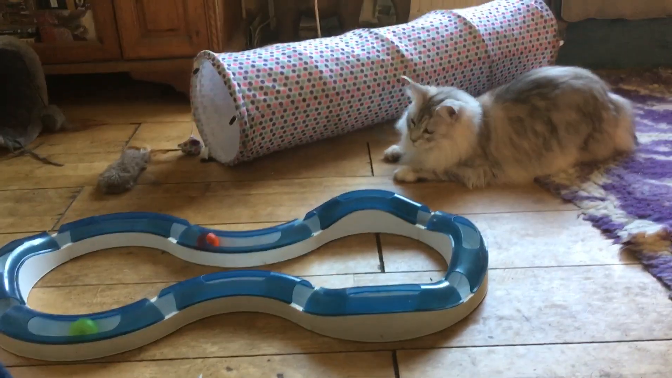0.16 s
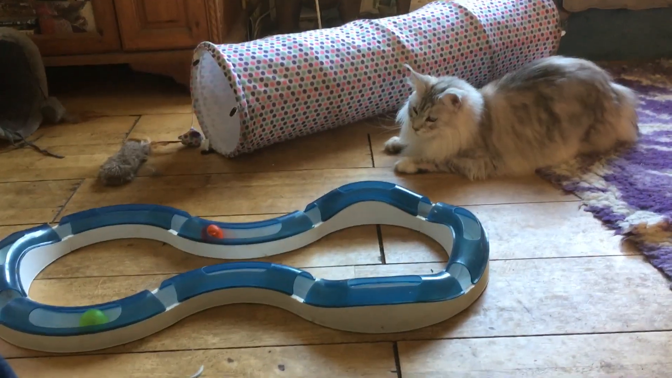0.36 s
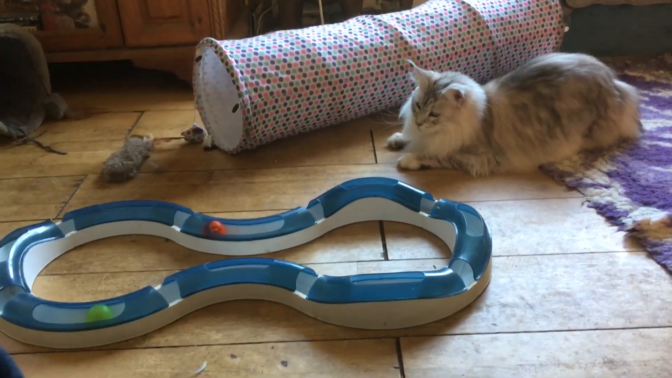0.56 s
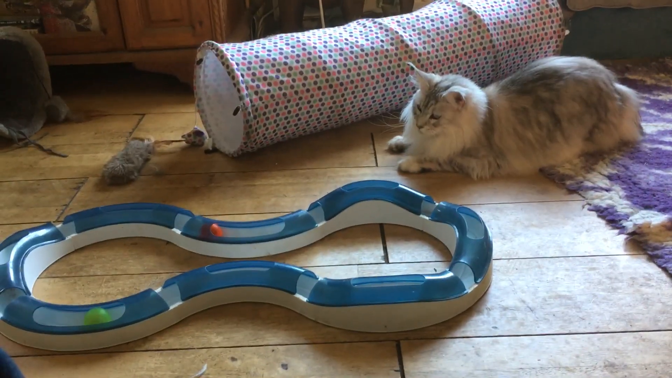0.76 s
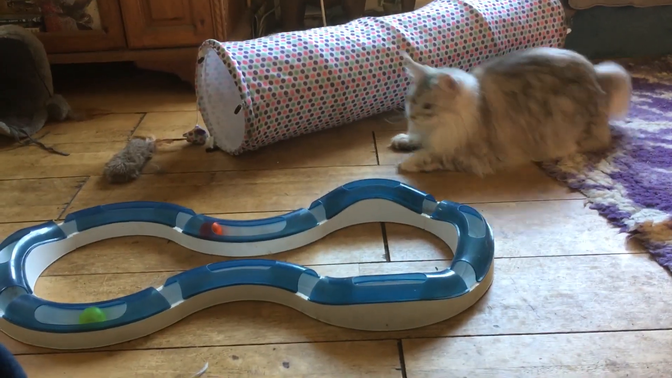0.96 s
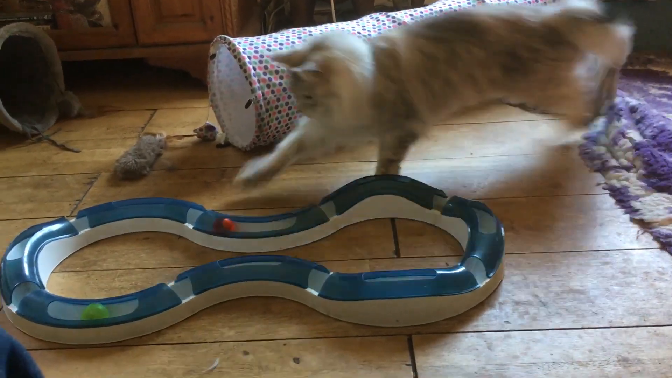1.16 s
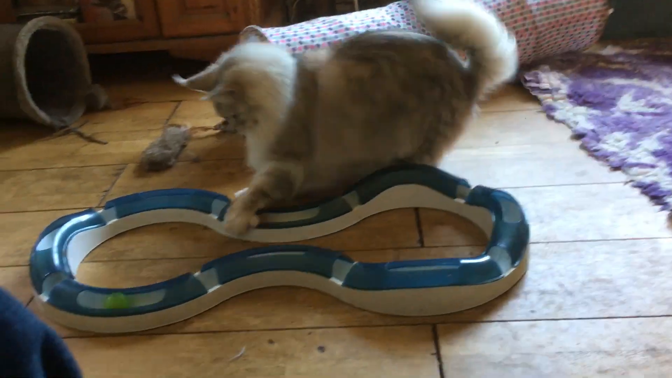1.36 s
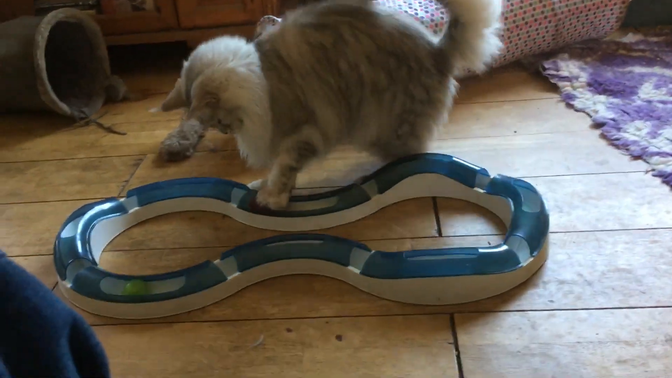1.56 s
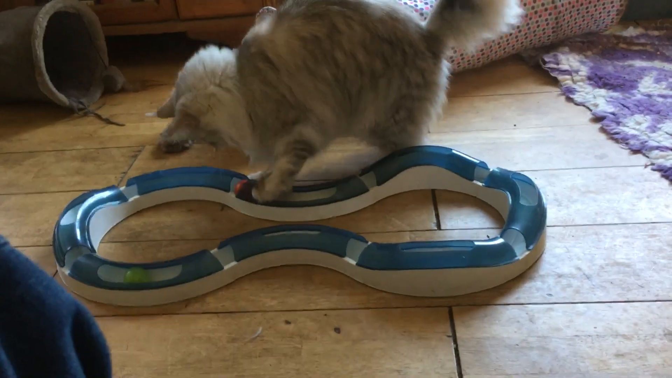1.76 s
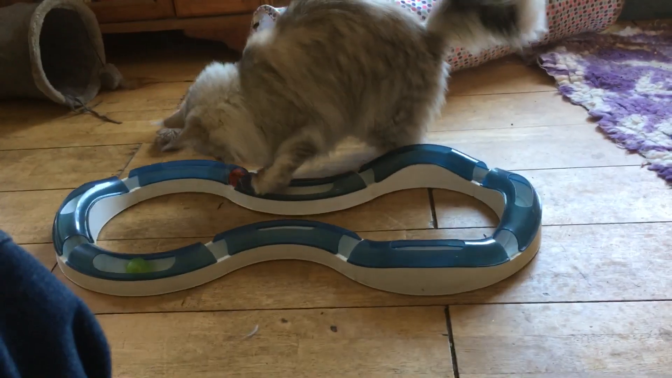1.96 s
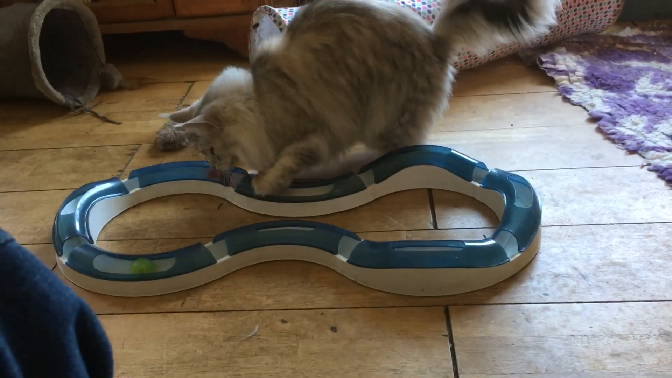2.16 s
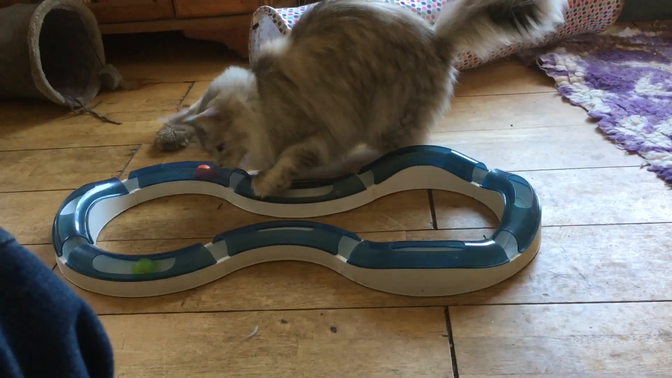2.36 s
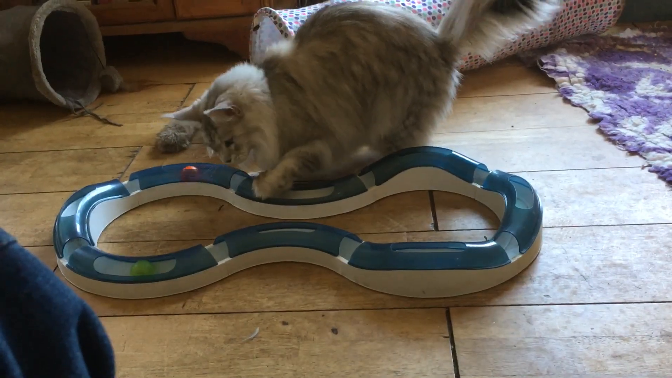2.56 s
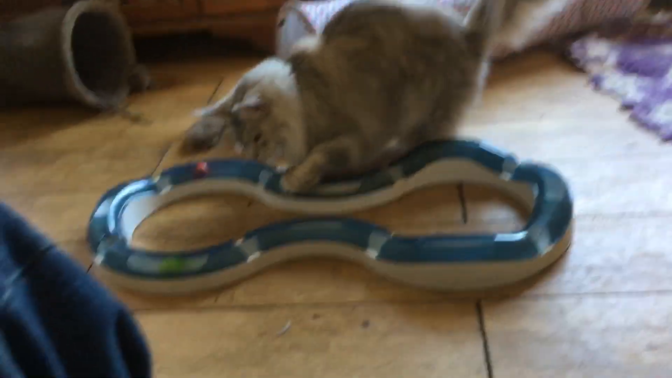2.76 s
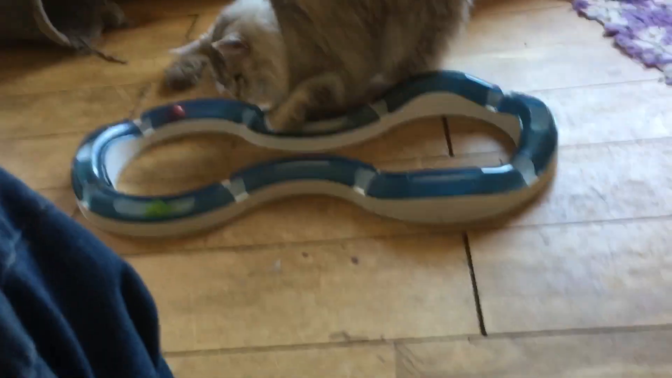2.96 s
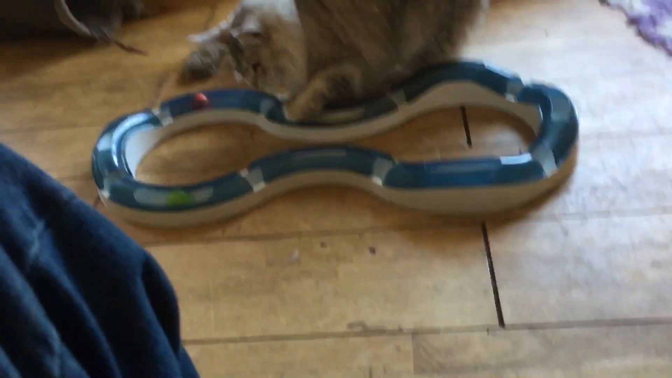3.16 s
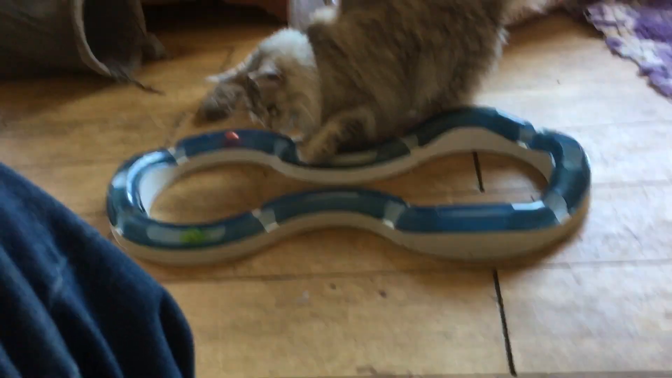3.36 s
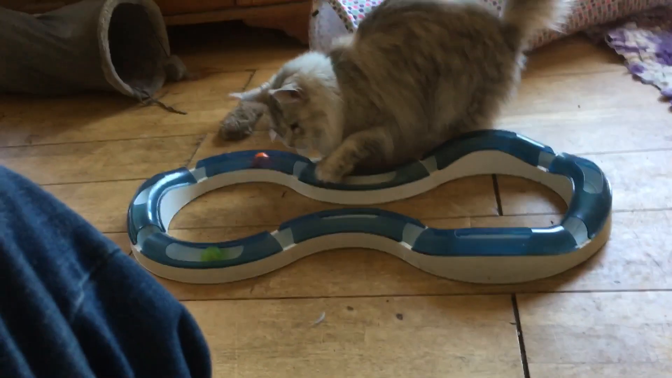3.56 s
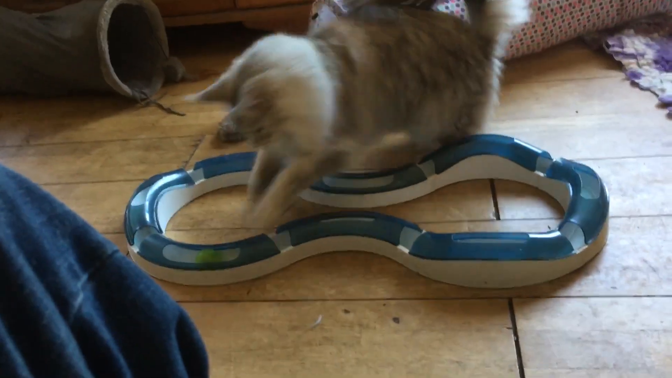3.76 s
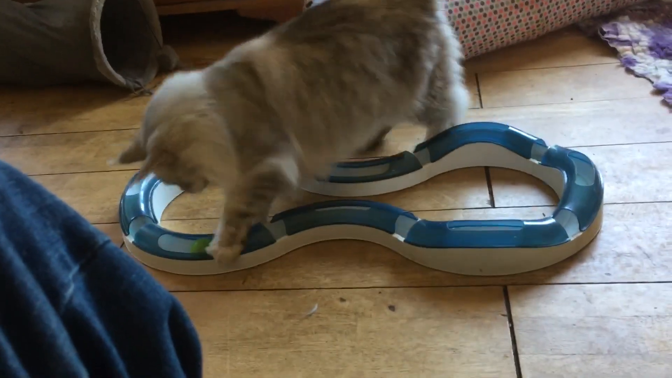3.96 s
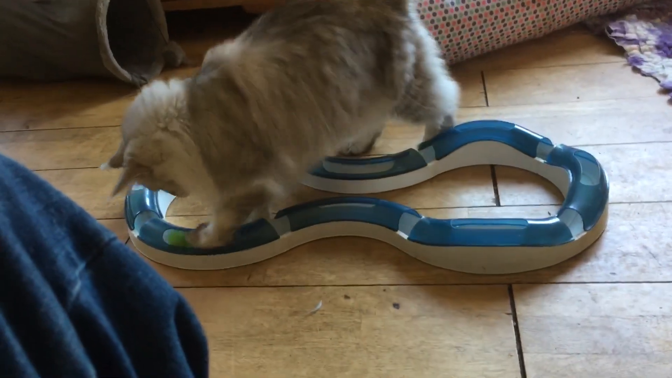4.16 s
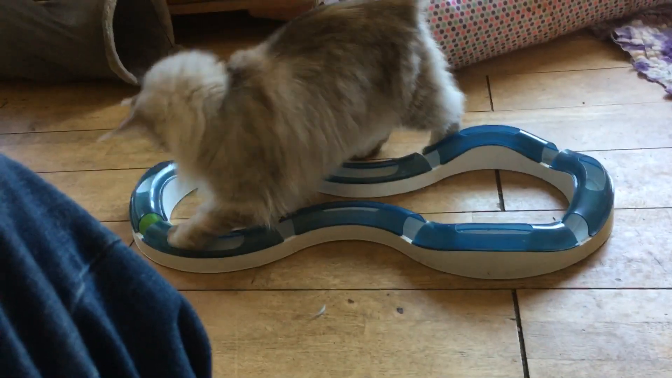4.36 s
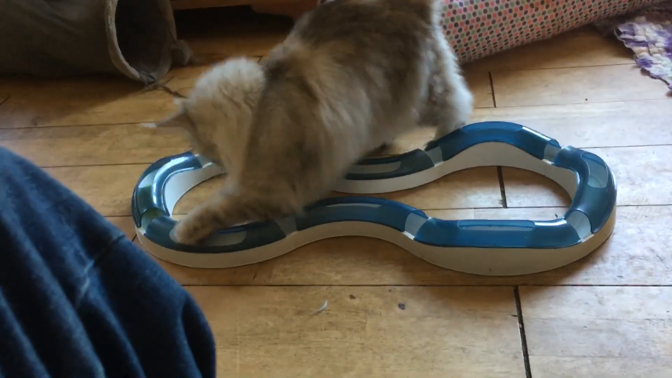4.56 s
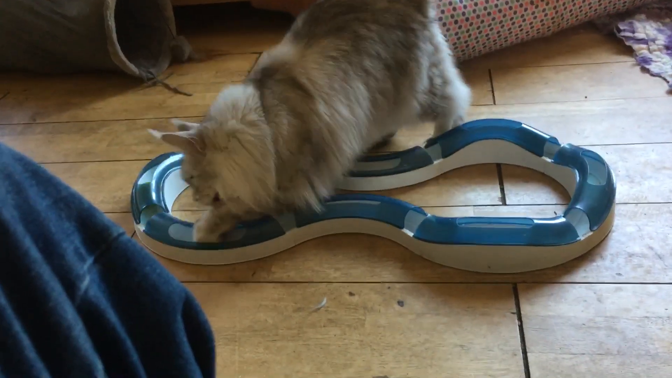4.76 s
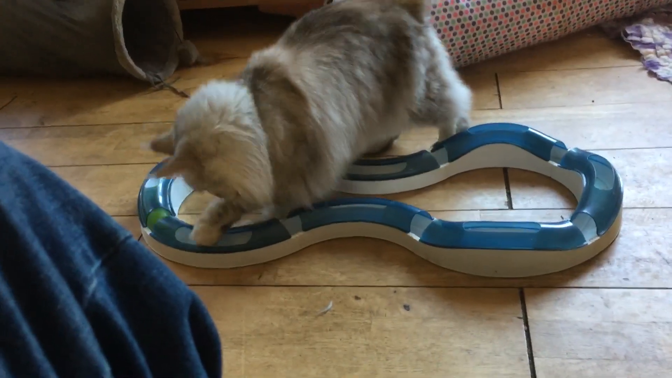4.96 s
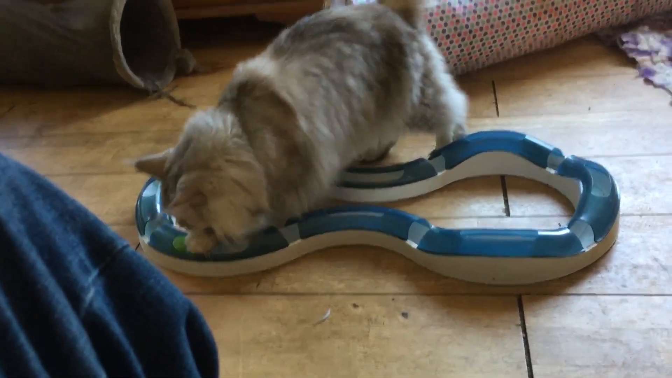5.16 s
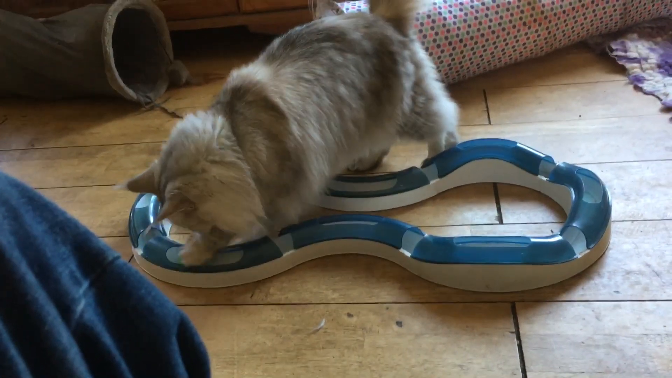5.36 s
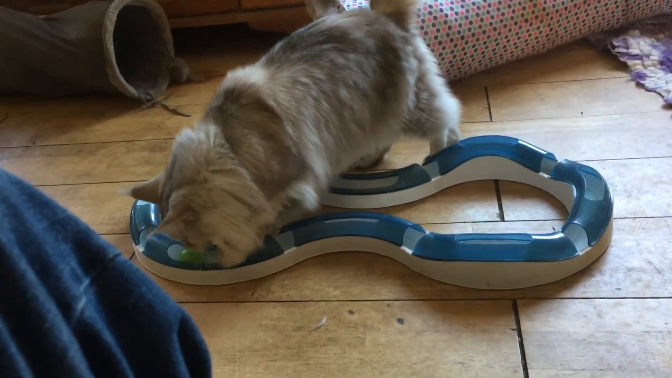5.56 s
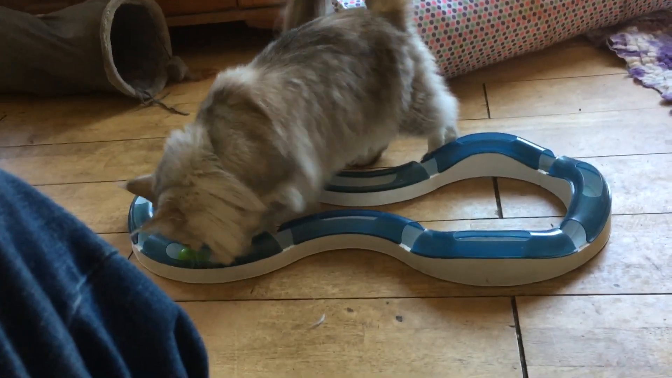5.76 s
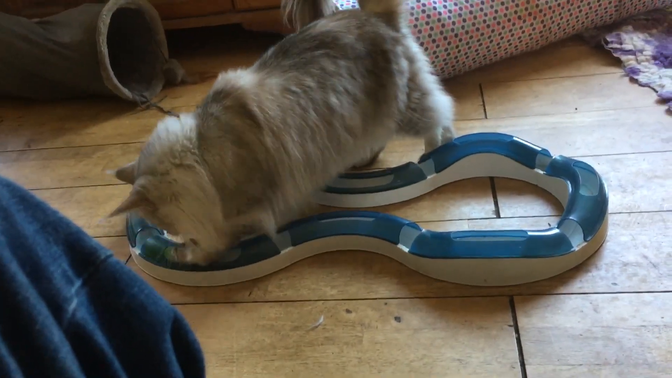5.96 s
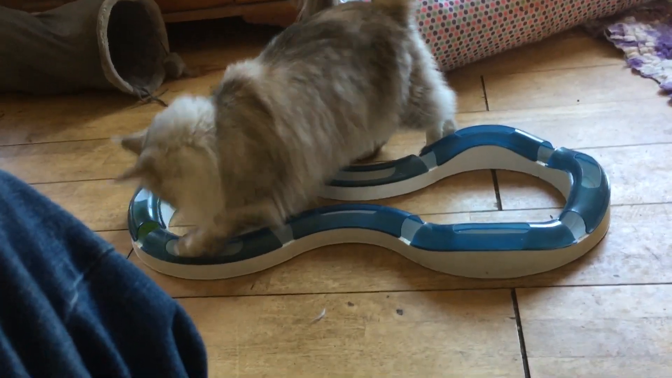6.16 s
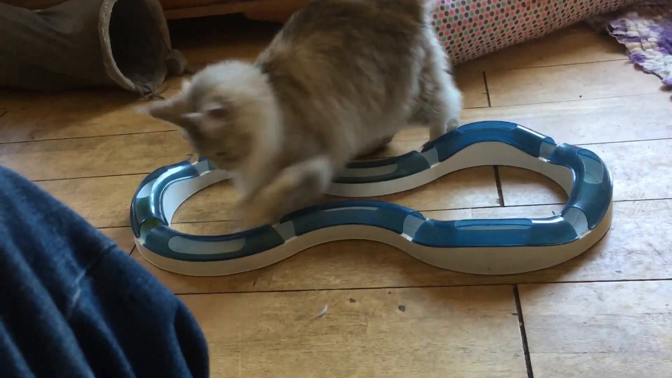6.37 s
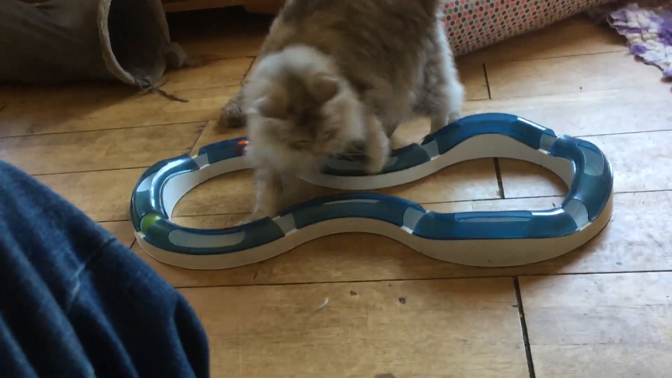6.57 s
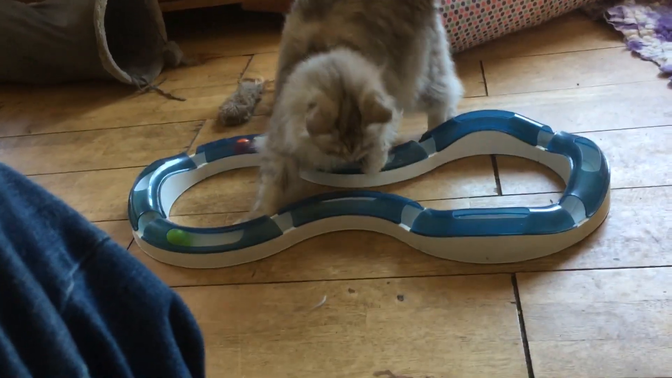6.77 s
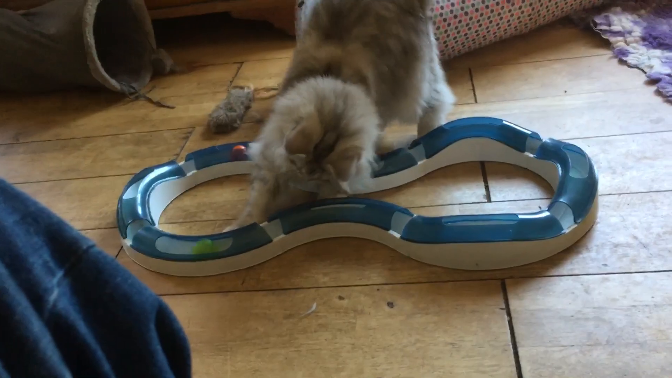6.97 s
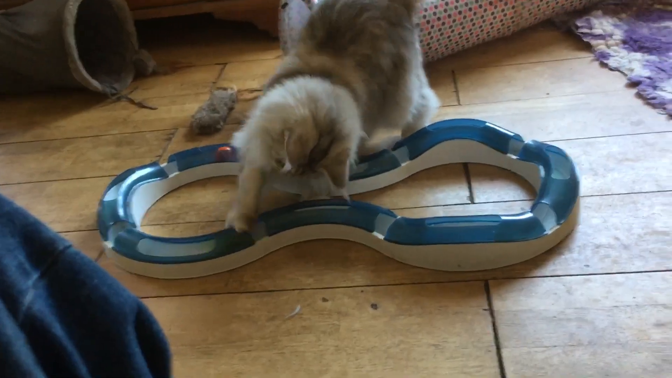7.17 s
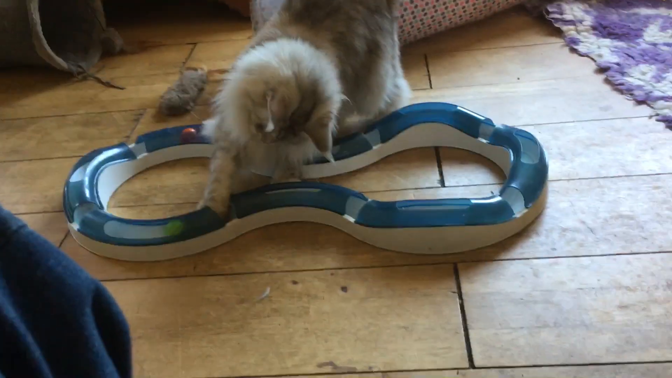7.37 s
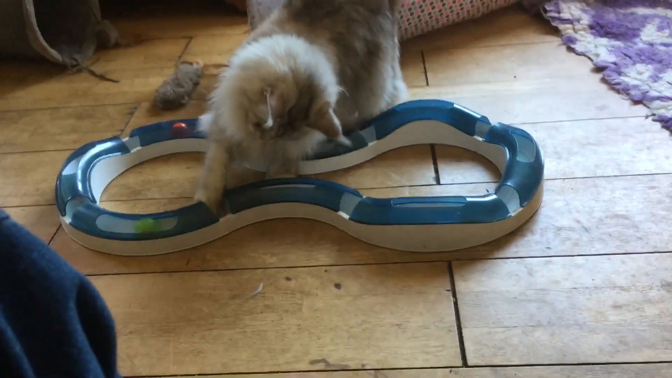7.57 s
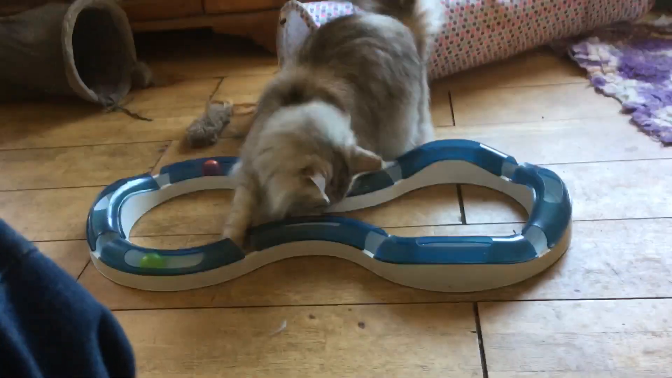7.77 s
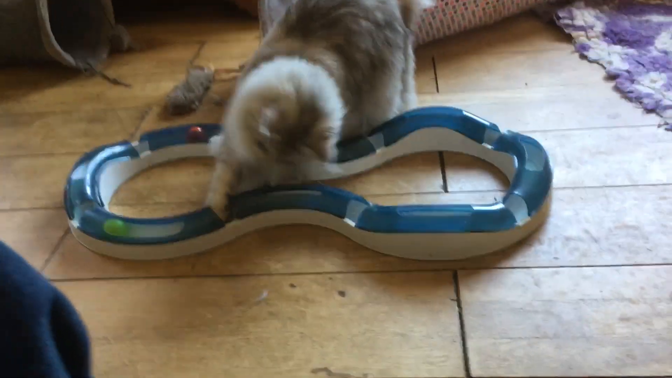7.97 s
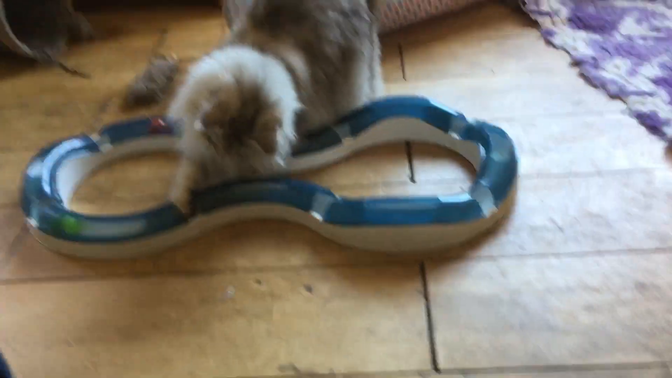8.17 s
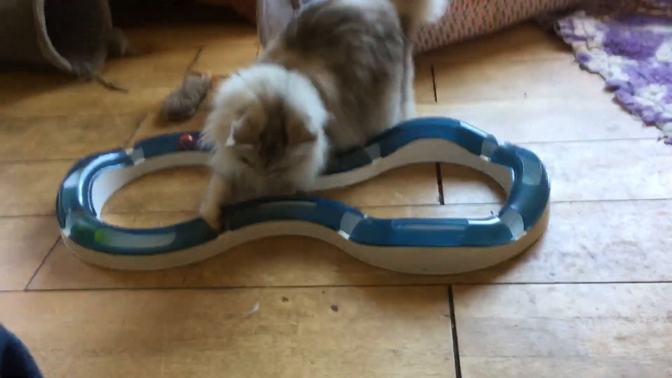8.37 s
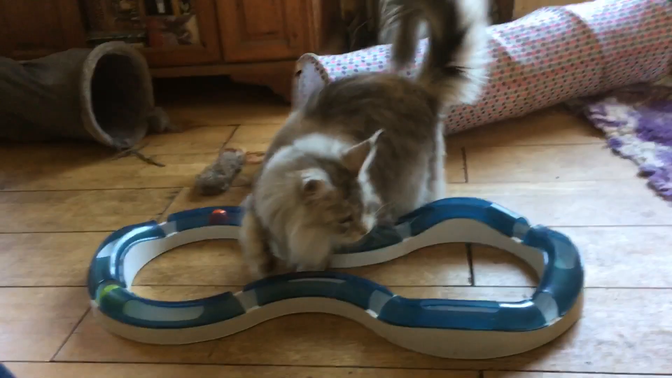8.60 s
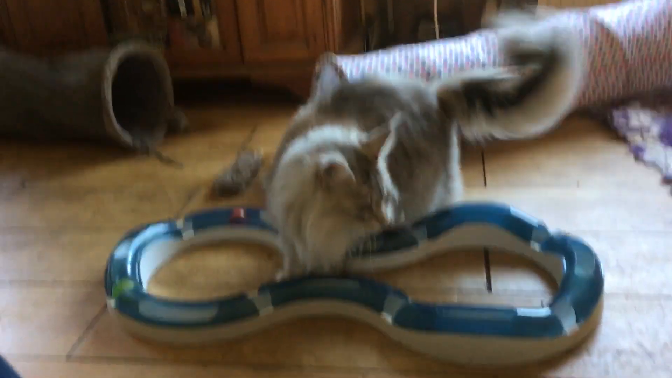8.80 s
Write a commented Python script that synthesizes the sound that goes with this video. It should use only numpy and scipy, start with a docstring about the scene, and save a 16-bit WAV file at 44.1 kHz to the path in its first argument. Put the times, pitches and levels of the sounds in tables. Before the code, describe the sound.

A quiet indoor room with faint low air and microphone hiss, almost still for the first 0.9 seconds. Fur rustles briskly around 1.0, and at 1.3 a loud, hollow plastic crack lands with a soft thump on boards, followed by smaller clicks and another strong knock at 1.6. From 1.9 to 3.7 it is sparse: faint rolling, light scuffs, claw ticks, and a dry close tap at 2.65. Batting resumes at 3.8, with a dense clatter of sharp clacks at 3.9 to 4.35 and short rattling rolls over low rumble. Softer hollow knocks come near 5.0. A busy run of clicks and rolls fills 5.8 to 7.0, then a brushy swish and bright double clack at 7.05 to 7.2. Lighter knocks, dry taps and a soft thump cluster around 7.6 to 8.0, thinning to faint scuffs by 8.8.

```python
"""Cat batting balls along a plastic track

A cat bats light balls along a hollow plastic track on a wooden floor in a quiet room.
Claws and balls knock on the track: short chatters of clicks ring its modes. Paws push the boards.
Rolling balls and shifting weight feed random grains to the modes of track and boards.
Fur and cloth brush as banded grains, claws tick as noise snaps, dry taps sound near the microphone."""
import sys
import numpy as np
from scipy import signal
from scipy.fft import rfft, irfft, next_fast_len
from scipy.io import wavfile

SR = 44100
rng = np.random.default_rng(int(sys.argv[2]) if len(sys.argv) > 2 else 0)


def generate_wav(sig):
    """Save sig (samples, or channels by samples) to the path in sys.argv[1] as 16-bit PCM at SR."""
    pcm = np.round(np.clip(np.atleast_2d(sig).T, -1, 1) * 32767).astype(np.int16)
    wavfile.write(sys.argv[1], SR, pcm)


N = 389623   # samples


def from_db(db):
    """Amplitude ratio of a level in dB."""
    return 10 ** (np.asarray(db) / 20)


def rms_one(x):
    """Scales a signal to rms 1."""
    return x / np.sqrt(np.mean(x ** 2) + 1e-20)


def at_hz(points, hz):
    """Reads a (Hz, value) table, straight in log frequency and flat beyond its ends."""
    points = np.array(points)
    return np.interp(np.log(hz), np.log(points[:, 0]), points[:, 1])


def coloured(x, spectrum):
    """Shapes a steady signal by a spectrum in dB; rms 1."""
    size = next_fast_len(N)
    hz = np.maximum(np.arange(size // 2 + 1) * SR / size, 1)
    shaped = rfft(x, size) * from_db(at_hz(spectrum, hz))
    return rms_one(irfft(shaped, size)[:N])


def ring(clicks, hz, t60_s):
    """Mode as a two-pole resonator: a unit click starts a decaying sine of height about 1."""
    radius = from_db(-60 / (max(t60_s, .001) * SR))
    angle = 2 * np.pi * hz / SR
    poles = [1, -2 * radius * np.cos(angle), radius ** 2]
    return signal.lfilter([0, np.sin(angle)], poles, clicks + 1e-18)   # offset avoids denormals


def grains(per_s, spread_db):
    """Rough contact: random clicks of uneven size and sign."""
    sizes = from_db(spread_db * np.minimum(rng.exponential(1, N), 4))
    signs = rng.choice([-1, 1], N)
    return sizes * signs * (rng.random(N) < per_s / SR)


def swells(start_s, rise_s, hold_s, fall_db_per_s):
    """One gain per row, each millisecond: a squared rise, a hold, then an even fall in dB."""
    t = np.arange(N * 1000 // SR + 2) / 1000 - start_s[:, None]
    rise_s = np.maximum(rise_s, .002)[:, None]
    past_hold_s = np.maximum(t - rise_s - hold_s[:, None], 0)
    return np.clip(t / rise_s, 0, 1) ** 2 * from_db(-fall_db_per_s * past_hold_s)


def per_sample(gain):
    """Stretches a gain per millisecond to one per sample."""
    return np.interp(np.arange(N) * 1000 / SR, np.arange(len(gain)), gain)


def drift(knots_per_s):
    """Slow chance: random knots of spread 1 joined by straight lines."""
    knots = rng.standard_normal(int(N / SR * knots_per_s) + 2)
    return np.interp(np.arange(N) / SR * knots_per_s, np.arange(len(knots)), knots)


# Still room and microphone hiss. Each row: frequency in Hz, relative density in dB per Hz.
AIR_SPECTRUM = [(18, -96), (30, 3.5), (59, 4), (81, -7.5), (221, -22.5), (311, -14), (345, -30.5),
                (404, -28), (780, -29), (1070, -28), (1500, -33), (1760, -31.5), (4190, -34),
                (11700, -34.5), (16000, -44)]
AIR_RMS_DB = -59.5


def still_air():
    """Steady noise of the room and microphone, coloured by its spectrum."""
    return from_db(AIR_RMS_DB) * coloured(rng.standard_normal(N), AIR_SPECTRUM)


# Rolls of a ball. Each row: start in seconds, rise in seconds (at least 0.002 is used),
# hold in seconds, level of ball on track in dB, level of rumble in boards in dB.
ROLLS = [(0.0, 0.0017, 0.013, -57, -73), (0.908, 0.094, 0.23, -67.5, -66), (1.258, 0.028, 0.16, -65, -59),
         (1.586, 0.23, 0.14, -67, -85), (1.843, 0.038, 0.1, -61, -71.5), (2.403, 0.034, 0.065, -82, -65),
         (2.537, 0.045, 0.081, -66, -62), (2.73, 0.072, 0.034, -77, -94), (3.168, .06, .22, -79.5, -64),
         (3.513, 0.059, 0.14, -68, -69), (4.048, .07, 0.13, -57, -55.5), (4.26, 0.075, .12, -57, -57.5),
         (4.742, 0.12, 0.15, -60, -63), (4.96, 0.061, 0.18, -58.5, -52.5), (5.31, 0.068, .15, -85, -69.5),
         (5.791, 0.062, .14, -54, -53.5), (6.018, 0.034, 0.11, -60, -57.5), (6.37, .12, 0.12, -59.5, -59),
         (6.577, 0.085, 0.16, -60.5, -54.5), (6.835, 0.043, 0.26, -60.5, -61.5),
         (7.155, 0.048, 0.29, -66.5, -62), (7.72, 0.11, 0.087, -64.5, -57.5),
         (7.95, 0.045, 0.097, -64, -61), (8.176, 0.066, 0.11, -68, -66), (8.37, .05, .03, -76, -64),
         (8.478, 0.03, 0.038, -73, -57), (8.639, 0.032, .03, -75, -62), (8.753, 0.021, 0.072, -69.5, -65)]
ROLL_FALL_DB_PER_S, ROLL_WOBBLE_DB = 188, 1.34
REST_BALL_DB, REST_BOARDS_DB = -76, -75   # small shifts of cat and track between the rolls


def motion():
    """Levels in dB of ball and boards: all rolls added to the rest level, wobbling a little."""
    start_s, rise_s, hold_s, ball_db, boards_db = np.transpose(ROLLS)
    shape = swells(start_s, rise_s, hold_s, ROLL_FALL_DB_PER_S)
    levels_db = []
    for roll_db, rest_db in ((ball_db, REST_BALL_DB), (boards_db, REST_BOARDS_DB)):
        gain = from_db(rest_db) + per_sample(from_db(roll_db) @ shape)
        levels_db.append(20 * np.log10(gain) + ROLL_WOBBLE_DB * drift(8.3))
    return levels_db


# Modes of the track. Each row: frequency in Hz, relative level in dB,
# 60 dB decay time in seconds (at least 0.001 is used).
TRACK_MODES = [(366, -0.5, 0.033), (471, -0.5, 0.018), (613, 0, 0.022), (757, -9.5, 0.026),
               (917, -3.5, 0.013), (1217, 2.5, 0.0081), (1504, -0.5, 0.0062), (1700, 0, 0.0053),
               (2052, -0.5, 0.0066), (2325, -1.5, 0.0099), (2530, -13.5, 0.029), (3190, -3, 0.0091),
               (3310, 2, 0.0033), (4550, 9, 0.00057), (4720, 3, 0.0041), (5230, -12, 0.0019),
               (6140, -3.5, 0.0038), (7700, -9.5, 0.004), (8500, -0.5, 0.0015), (10040, -4.5, 0.0033),
               (12100, -10.5, 0.0082), (13200, -50, 0.00047)]


def rolling(ball_db, soft_hz, bumps_db, brighten):
    """The ball meets fine roughness and coarser seams; its soft contact leaves the high modes still."""
    seams = from_db(bumps_db) * grains(120.0, spread_db=3.5)
    out = np.zeros(N)
    for hz, mode_db, t60_s in TRACK_MODES[:12]:
        roughness = grains(700.0, spread_db=4.5)
        mode = rms_one(ring(seams + roughness, hz, t60_s))
        # a faster, louder ball reaches higher modes
        pace_db = brighten * (ball_db + 45.0) * np.log2(hz / 600)
        out += from_db(pace_db + mode_db) * mode
    soft = signal.butter(2, soft_hz, fs=SR, output="sos")
    return from_db(ball_db - 9) * signal.sosfilt(soft, out)


# Modes of the floor boards. Each row: frequency in Hz, relative level in dB,
# 60 dB decay time in seconds.
BOARD_MODES = [(60.8, -5.5, 0.43), (98, -10.5, 0.046), (128.8, -5.5, 0.18), (172, 2.5, 0.045),
               (222.4, -5.5, 0.046), (302, -9.5, 0.018)]


def rumble(rumble_db):
    """Rolling and shifting weight shake the board modes, all but the lowest."""
    push = grains(320.0, spread_db=4.5)
    boards = sum(from_db(mode_db) * ring(push, hz, t60_s) for hz, mode_db, t60_s in BOARD_MODES[1:])
    return from_db(rumble_db) * rms_one(boards)


# Spectrum of the fibres. Each row: frequency in Hz, relative density in dB per Hz.
BRUSH_SPECTRUM = [(400, -9), (1500, 7.5), (3800, 2.5), (8500, 4), (11500, -2), (13500, -7), (16000, -5)]
# Strokes of fur and cloth. Each row: start in seconds, rise in seconds, hold in seconds,
# level in dB, centre of the lifted band in Hz, its lift in dB.
STROKES = [(0.0, 0.0039, 0.019, -66.5, 3400, 10), (0.911, 0.087, 0.069, -59, 3970, 7),
           (1.014, 0.055, 0.029, -46.5, 3920, 10.5), (1.138, .03, 0.14, -66.5, 3500, -5),
           (1.27, 0.025, .12, -54, 3600, 15), (1.416, 0.022, 0.047, -57.5, 2580, 10),
           (1.566, 0.055, 0.083, -62, 2660, 10), (1.631, 0.087, .15, -57, 2550, 18),
           (1.875, 0.025, 0.078, -62, 2700, 11), (2.565, .06, 0.27, -77, 3720, 2),
           (3.053, 0.035, 0.017, -64, 9500, 7.5), (3.506, .04, 0.063, -65, 3000, 6),
           (3.624, 0.031, .02, -62, 3450, 16), (3.746, 0.053, .04, -61.5, 3160, 1),
           (3.994, 0.076, 0.062, -58, 2410, 9), (5.37, 0.019, 0.12, -75.5, 4200, 3),
           (5.673, 0.16, 0.11, -61.5, 2350, 7), (7.072, 0.15, 0.013, -51, 2280, 15.5),
           (7.514, 0.022, 0.067, -66.5, 2940, 5), (7.653, 0.16, .3, -63, 3670, 8),
           (8.2, 0.017, 0.25, -72, 4000, 6.5)]
STROKE_FALL_DB_PER_S = 184
STROKE_SCRATCH_DB = 4   # quick unevenness of a stroke


def brushing(octaves):
    """Dense fibre grains in third-octave bands, lifted around each stroke's own pitch."""
    start_s, rise_s, hold_s, brush_db, bright_hz, lift_db = np.transpose(STROKES)
    shape = swells(start_s, rise_s, hold_s, STROKE_FALL_DB_PER_S)
    # two sets, so neighbouring bands are unrelated
    fibres = [coloured(grains(9000.0, spread_db=4.5), BRUSH_SPECTRUM) for _ in range(2)]
    edges_hz = 315 * 2 ** np.arange(0, 6.1, 1 / 3)
    out = np.zeros(N)
    for k, (low, high) in enumerate(zip(edges_hz, edges_hz[1:])):
        band = signal.butter(2, [low, min(high, .45 * SR)], "band", fs=SR, output="sos")
        near = np.exp(-(np.log2(np.sqrt(low * high) / bright_hz) / octaves) ** 2)
        gain = from_db(brush_db + lift_db * (near - 0.58)) @ shape
        out += per_sample(gain) * signal.sosfilt(band, fibres[k % 2])
    return from_db(STROKE_SCRATCH_DB * drift(28.0)) * out


# Knocks on the track. Each row: time in seconds, relative strength in dB, lift of the hollow
# low modes in dB, lift of the sharp high modes in dB, struck spot as a frequency in Hz.
KNOCKS = [(0.989, -52, 2.5, 10, 2040), (1.195, -41.5, -12, 4, 2000), (1.286, -41, -10, 7.5, 550),
          (1.305, -15.5, -9.5, -5.5, 1100), (1.395, -53, -5, 0, 1320), (1.417, -44, -18, 4, 1460),
          (1.325, -34, -2, -3, 1260), (1.34, -35, -16, -5, 1930), (1.468, -32.5, -3.5, -16, 683),
          (1.555, -46.5, -1, -10, 1220), (1.612, -48, 5, -13, 1140), (1.631, -21, -14, -19, 1190),
          (1.922, -43.5, 7, 1, 686), (2.096, -47.5, 2.5, -18, 2620), (2.582, -47, -9, -8, 523),
          (2.708, -49, 3.5, -17, 767), (2.786, -56.5, -10, 9, 554), (3.015, -57, 9, 4, 1200),
          (3.233, -50.5, -2, -19, 1330), (3.377, -52.5, 4, -14, 1170), (3.783, -40, -20, 2, 1800),
          (3.792, -30.5, -5, -1, 1030), (3.936, -25.5, -17, 5.5, 2050), (4.049, -31, -12, -13, 2550),
          (4.055, -27, -13, -10, 2500), (4.068, -19.5, -18, -9, 2030), (4.073, -26, -11, -8.5, 2130),
          (4.089, -27.5, -14, -5, 1400), (4.229, -37.5, -3, -15, 590), (4.263, -38.5, -2, -16, 590),
          (4.304, -21, -11.5, -20.5, 565), (4.331, -31.5, 2, -12, 1130), (4.352, -24, -9.5, -26, 610),
          (4.568, -48, -11, -3, 1330), (4.807, -49, 2.5, -12, 947), (4.889, -56, 15, -5, 696),
          (5.007, -42, -9, -17, 501), (5.033, -31, -2, -15, 536), (5.102, -39, -5, -13, 587),
          (5.13, -43, 2, -15, 686), (5.195, -42, -3, -32, 710), (5.836, -44.5, -25, 0, 2150),
          (5.853, -29.5, -4, -3, 2220), (5.871, -30.5, 1, -13, 2210), (5.929, -30, -7.5, -24, 674),
          (5.949, -33, -4, -14, 495), (5.974, -36, -4, -23, 570), (6.037, -27.5, -4, -23, 2530),
          (6.06, -43.5, -1, -5, 1500), (6.118, -49, 7.5, -5, 625), (6, -47.5, 11, -12, 501),
          (6.145, -51.5, 8, -13, 625), (6.496, -52, 9.5, -6, 620), (6.514, -35.5, -4, -21, 509),
          (6.61, -33.5, -6, -22, 581), (6.638, -35.5, -6, -14, 2300), (6.667, -38, -8, -25, 1810),
          (6.701, -45, 3, -24, 634), (6.737, -37.5, -22, -36, 1490), (6.763, -38.5, -17, -27, 2160),
          (6.814, -34, -15, -25, 670), (6.889, -37.5, -3, -32, 1110), (6.938, -39.5, -4, -30, 1220),
          (6.869, -44.5, 0, -27, 1060), (6.917, -50, 6, -24, 2200), (7.002, -43.5, 0, -25, 2120),
          (7.017, -38.5, -7, -28, 587), (7.058, -37, -27, -2.5, 2430), (7.161, -27, -16, -11, 2100),
          (7.18, -21.5, -22, -7, 1290), (7.276, -55, -6, 2, 2190), (7.371, -42, -7, -11, 606),
          (7.692, -41.5, -1, -6, 546), (7.766, -39, -1, -14, 546), (7.821, -44, -6, -17, 545),
          (7.844, -30.5, -34, 2, 2320), (7.867, -58, 0, -1, 900), (7.932, -56.5, 12, 5, 664),
          (7.995, -39, -1, -21, 920), (8.048, -51.5, 14, 8, 498), (8.414, -66, 16.5, -7, 590),
          (8.522, -51, 8.5, -20, 510)]
# room share of a knock of strength -37.5 dB; hard knocks feed the room a little less
ECHO_DB, ECHO_LAG_DB_PER_DB = 0.5, 0.1662
ECHO_DULL_DB = -0.5   # the sharp high modes beam forward and reach the walls less


def knocks(spread_db, spot_db, fade_db, level_db, chatter_s, count=5):
    """A chatter of contacts on every mode, most near the spot; returns direct sound and room feed."""
    s, peak_db, hollow_db, sharp_db, spot_hz = np.transpose(KNOCKS)
    echo_db = ECHO_DB - ECHO_LAG_DB_PER_DB * (peak_db + 37.5)
    chance = rng.standard_normal((len(s), len(TRACK_MODES), count))
    steps = np.arange(count) + rng.uniform(0, .8, (len(s), count))
    at = np.round((s[:, None] + chatter_s * steps) * SR).astype(int)
    # a light first touch, the full blow, then bounces
    shape_db = -fade_db * np.abs(np.arange(count) - 1)
    out = np.zeros((2, N))
    for k, (hz, mode_db, t60_s) in enumerate(TRACK_MODES):
        low = np.clip(np.log2(1300 / hz), 0, 1)
        high = np.clip(np.log2(hz / 2700) / .5, 0, 1)
        near = np.exp(-(np.log2(hz / spot_hz) / 0.16) ** 2)
        strength_db = peak_db + mode_db + low * hollow_db + high * sharp_db + spot_db * near
        signs = rng.choice([-1, 1], (len(s), count))
        direct_db = strength_db[:, None] + shape_db + spread_db * chance[:, k]
        # the room averages all directions: one contact, less chance
        feed_db = strength_db + echo_db + high * ECHO_DULL_DB + 3.0 * chance[:, k, 0]
        clicks = np.zeros((2, N))
        np.add.at(clicks[0], at, signs * from_db(direct_db))
        np.add.at(clicks[1], at[:, 1], signs[:, 1] * from_db(feed_db))
        out += ring(clicks, hz, t60_s)
    return from_db(level_db) * out


# Paws on the boards. Each row: time in seconds, relative strength in dB, pitch in Hz,
# 60 dB decay time in seconds.
THUMPS = [(1.061, -69, 117, 0.064), (1.231, -50, 90, 0.086), (1.299, -33, 124.6, 0.083),
          (1.47, -48, 125, 0.097), (1.568, -51.5, 132, 0.079), (1.632, -47, 126, 0.11),
          (1.899, -56, 109, 0.094), (2.451, -60, 120, 0.044), (2.646, -44, 148, 0.036),
          (2.777, -45.5, 108, 0.062), (3.232, -57, 220, 0.084), (3.38, -55.5, 125, .065),
          (3.58, -39.5, 154, 0.04), (3.605, -50, 130, 0.075), (3.797, -45.5, 195, 0.046),
          (3.936, -45.5, 234, 0.048), (4.069, -40, 105, 0.067), (4.309, -43, 164, .095),
          (5.031, -44, 140, 0.15), (5.84, -45, 91, 0.061), (6.02, -47, 136, .08), (7.19, -51, 124, .12),
          (7.698, -40.5, 110, 0.092), (7.992, -59, 177, 0.11), (8.498, -55.5, 124, 0.074),
          (8.549, -55, 126, 0.091)]


def thumps(boards_db):
    """A padded push rocks the track for a few cycles at its own pitch and sets the board modes going."""
    own, push = np.zeros(N), np.zeros(N)
    for s, peak_db, hz, t60_s in THUMPS:
        i = round(s * SR)
        t = np.arange(min(N - i, SR // 2)) / SR
        fade = from_db(peak_db - 60 * (t / t60_s) ** 2)
        soft_onset = 1 - np.exp(-t / 0.0093)
        own[i:i + len(t)] += fade * soft_onset * np.sin(2 * np.pi * hz * t)
        push[i] = from_db(peak_db + boards_db)
    boards = sum(from_db(mode_db) * ring(push, hz, t60_s) for hz, mode_db, t60_s in BOARD_MODES)
    padded = signal.butter(2, 500.0, fs=SR, output="sos")
    return signal.sosfilt(padded, own + boards)


# Dry claw ticks. Each row: time in seconds, relative strength in dB, pitch in Hz.
TICKS = [(1.5344, -48, 8100), (2.607, -51, 6480), (2.6484, -32, 3630), (2.8564, -50, 4070),
         (3.3104, -51, 9910), (3.3623, -49, 4640), (3.377, -45, 5440), (3.4106, -54, 9540),
         (3.4521, -51, 4520), (3.663, -44.5, 4470), (3.7917, -33, 5700), (4.498, -54, 4150),
         (4.7376, -47, 9650), (4.9494, -51, 4220), (6.148, -41, 4550), (6.858, -44, 5200),
         (7.0616, -32, 4700), (7.4546, -45.5, 4030), (7.6056, -50, 6520), (7.674, -39.5, 3900),
         (7.8114, -56, 4450), (7.8233, -43, 4570), (7.8914, -50, 4070)]


def ticks(cycles, snap_s):
    """A claw tip slips: a snap of noise, stronger against the ring when loud, with some cycles of ring."""
    out, t = np.zeros(N), np.arange(SR // 100) / SR
    for s, peak_db, hz in TICKS:
        i = round(s * SR)
        tone = np.sin(2 * np.pi * hz * t) * from_db(-60 * t * hz / cycles)
        snap_db = 3.0 + 0.44 * (peak_db + 44)
        snap = from_db(snap_db) * rng.standard_normal(len(t)) * np.exp(-t / snap_s)
        out[i:i + len(t)] += from_db(peak_db - 6) * (tone + snap)
    return signal.sosfilt(signal.butter(2, 3200.0, "high", fs=SR, output="sos"), out)


# Dry taps close to the microphone. Each row: time in seconds, relative strength in dB, pitch in Hz.
TAPS = [(2.6498, -26, 560), (7.457, -45, 337), (7.606, -38, 260), (7.674, -33.5, 259), (8.765, -43, 294)]
TAP_CYCLES, TAP_RISE_S = 8, 0.00055   # cycles to fall 60 dB, onset time constant


def taps():
    """A few quickly damped cycles, with partials above and below; too near to stir the room."""
    out, t = np.zeros(N + SR), np.arange(SR // 10) / SR
    for s, peak_db, hz in TAPS:
        wave = np.zeros(len(t))
        for ratio, height in ((1, 1), (1.57, 0.41), (0.55, 0.24)):
            wave += height * np.sin(2 * np.pi * ratio * hz * t)
        fade = from_db(peak_db - 60 * t * hz / TAP_CYCLES)
        i = round(s * SR)
        out[i:i + len(t)] += fade * (1 - np.exp(-t / TAP_RISE_S)) * wave
    return out[:N]


# Decay of the room. Each row: frequency in Hz, 60 dB decay time in seconds.
ROOM_T60 = [(100, 0.28), (1000, 0.32), (4000, .3), (12000, 0.21)]
PAW_ROOM_DB, MOTION_ROOM_DB = -3.5, -13.5


def room(x):
    """Echo tail: noise in octave bands, each dying at its own rate, after a short gap."""
    t = np.arange(SR // 2) / SR
    tail = np.zeros(len(t))
    for hz in 63 * 2. ** np.arange(9):
        edges_hz = [hz / 2 ** .5, min(hz * 2 ** .5, .45 * SR)]
        band = signal.butter(2, edges_hz, "band", fs=SR, output="sos")
        noise = signal.sosfilt(band, rng.standard_normal(len(t)))
        tail += noise * from_db(-60 * t / at_hz(ROOM_T60, hz))
    tail *= np.clip((t - .003) / 0.0014, 0, 1)
    return signal.fftconvolve(x, tail / np.sqrt(np.sum(tail ** 2)))[:N]


def scene():
    """Blows fill the room more than the close, soft motion does; still air lies under all."""
    air = still_air()
    ball_db, rumble_db = motion()
    moving = rolling(ball_db, soft_hz=2310.0, bumps_db=6.5, brighten=0.16)
    moving = moving + rumble(rumble_db)
    moving = moving + brushing(octaves=.38)
    moving = moving + ticks(cycles=30.0, snap_s=0.00046)
    direct, feed = knocks(spread_db=4.0, spot_db=9.5, fade_db=3.5, level_db=-14.5, chatter_s=.0013)
    paws = thumps(boards_db=-1.5)
    echoes = room(feed + from_db(PAW_ROOM_DB) * paws + from_db(MOTION_ROOM_DB) * moving)
    return (direct + paws + moving + taps() + echoes + air)[None]


# Dips of the microphone port. Each row: frequency in Hz, width in Hz, depth from 0 to 1.
PORT_DIPS = [(4880, 450, 0.44), (7860, 1240, 0.39), (10380, 670, 0.58)]
BASS_CUT_HZ, TREBLE_STOP_HZ = 51, 16150


def record(dry):
    """The microphone port notches the treble; both ends are cut."""
    out = signal.sosfilt(signal.butter(3, BASS_CUT_HZ, "high", fs=SR, output="sos"), dry)
    for hz, width_hz, depth in PORT_DIPS:
        radius = np.exp(-np.pi * width_hz / SR)
        zeros = [(1 - radius ** 2) / 2, 0, (radius ** 2 - 1) / 2]
        poles = [1, -2 * radius * np.cos(2 * np.pi * hz / SR), radius ** 2]
        out = out - depth * signal.lfilter(zeros, poles, out)
    treble_cut = signal.cheby2(16, 50, TREBLE_STOP_HZ, fs=SR, output="sos")   # 50 dB down from here up
    return signal.sosfilt(treble_cut, out)


dry = scene()
out = record(dry)
generate_wav(out)
```